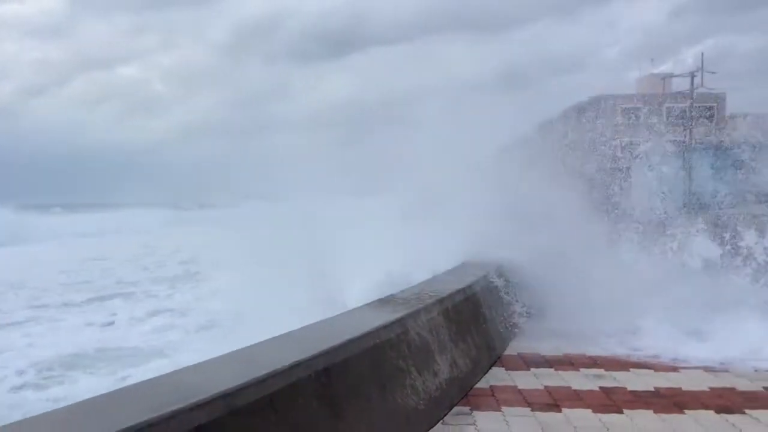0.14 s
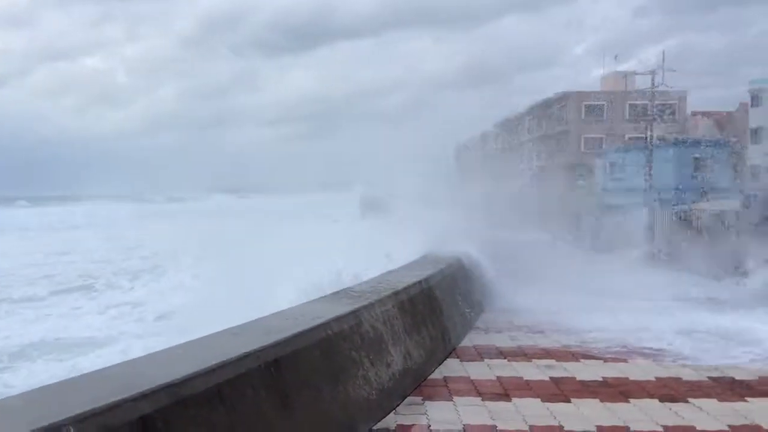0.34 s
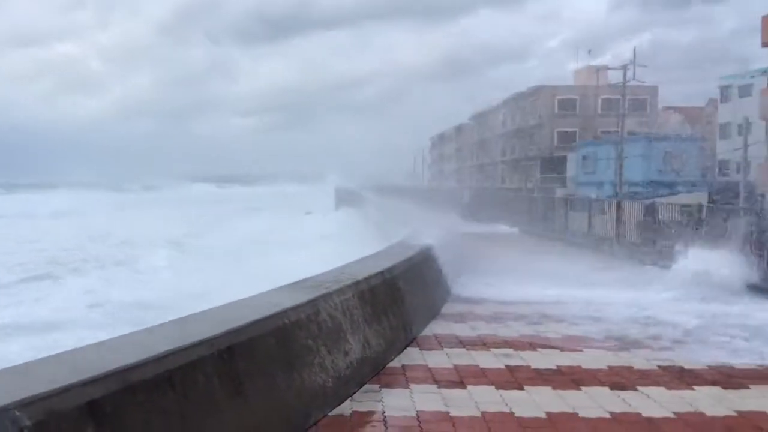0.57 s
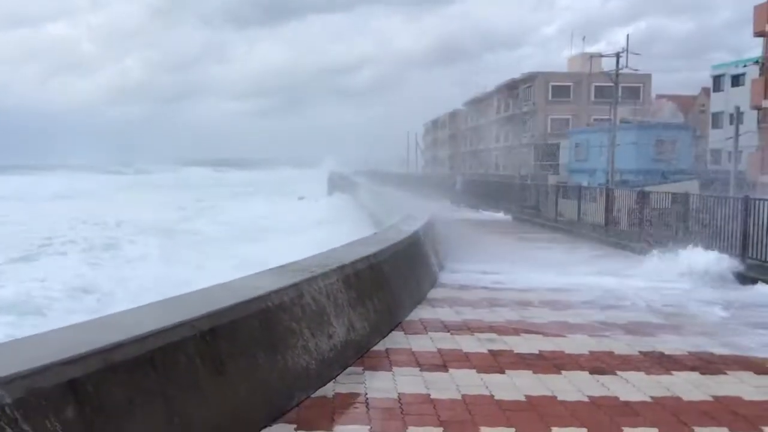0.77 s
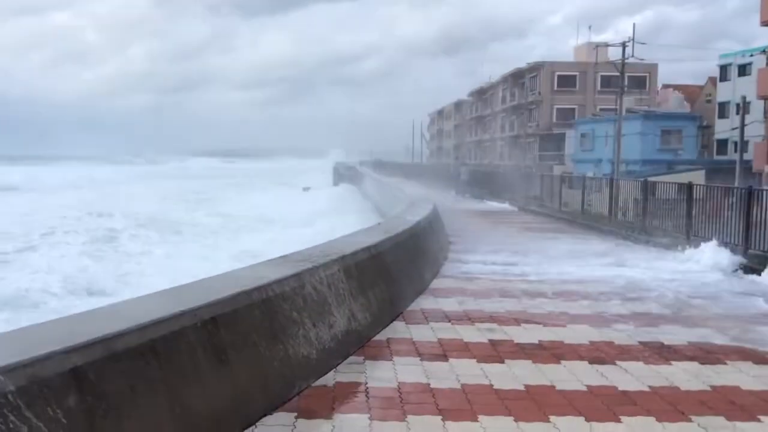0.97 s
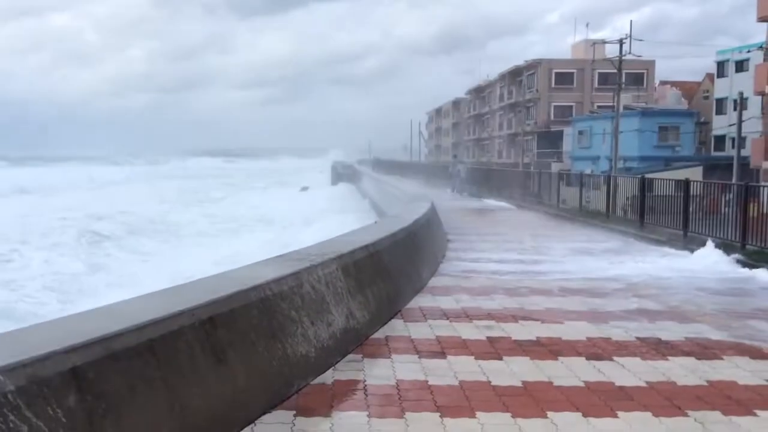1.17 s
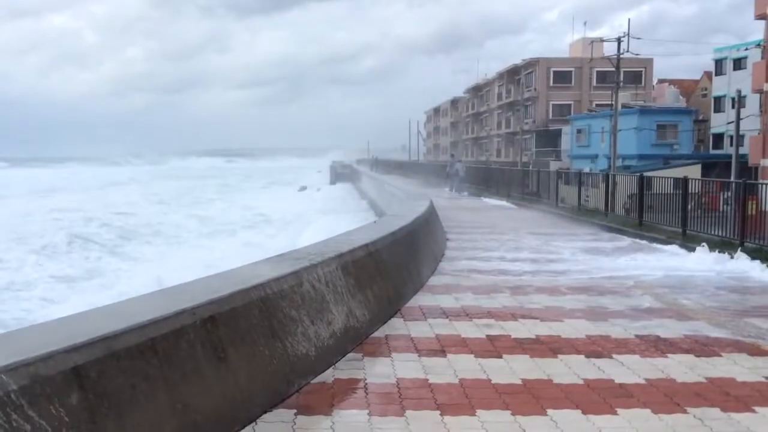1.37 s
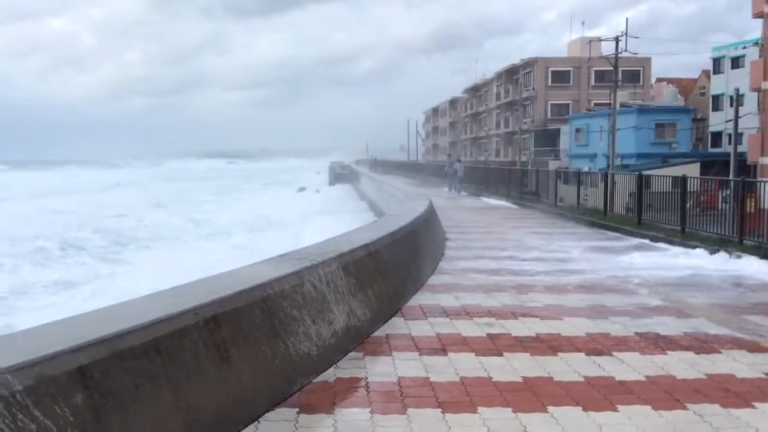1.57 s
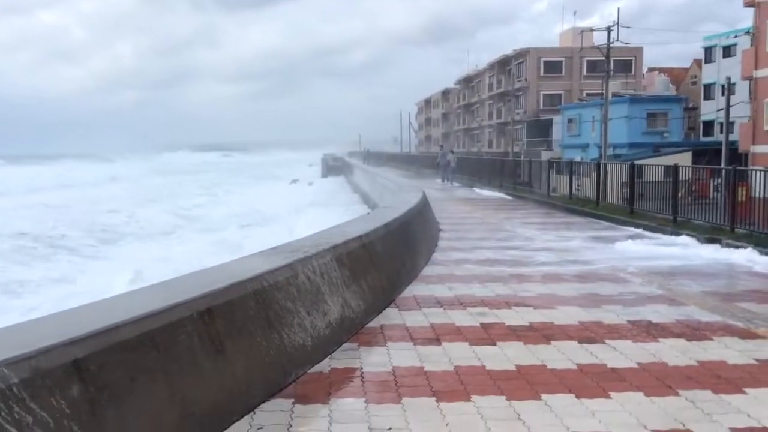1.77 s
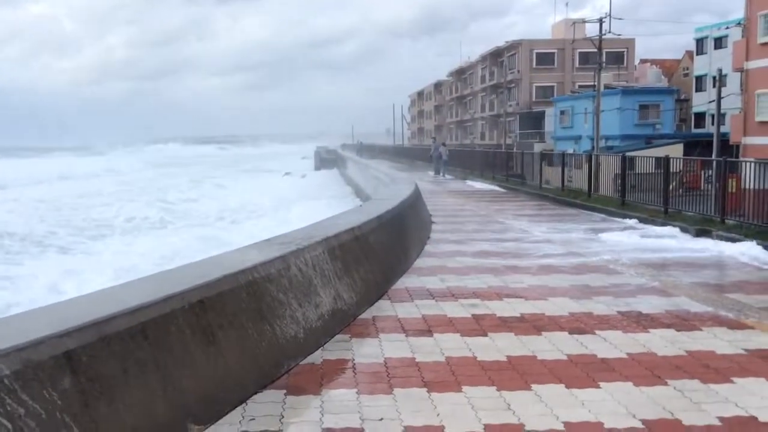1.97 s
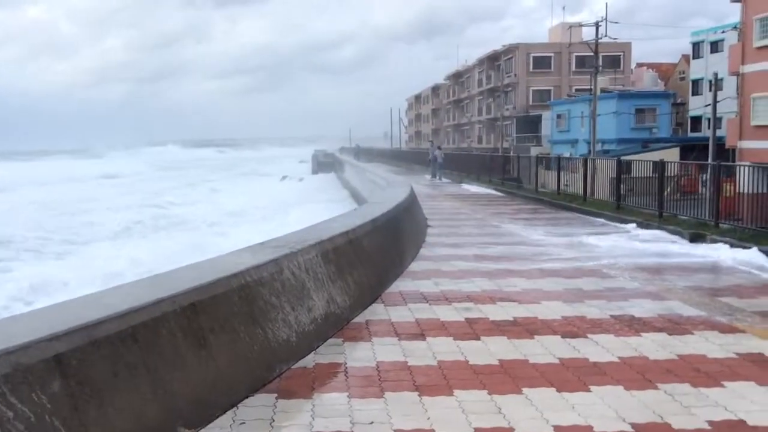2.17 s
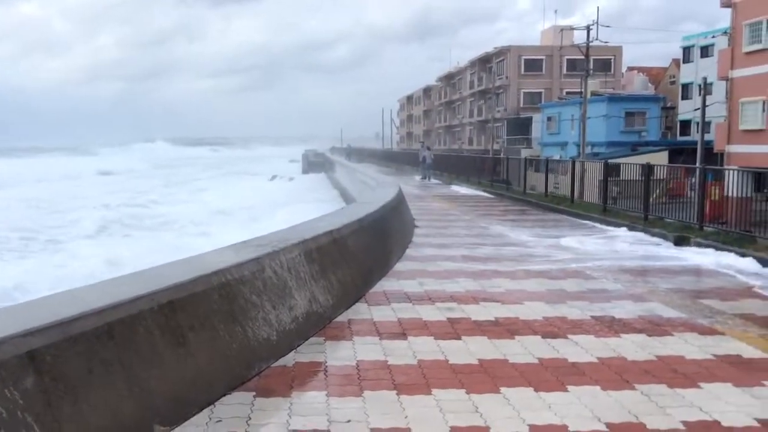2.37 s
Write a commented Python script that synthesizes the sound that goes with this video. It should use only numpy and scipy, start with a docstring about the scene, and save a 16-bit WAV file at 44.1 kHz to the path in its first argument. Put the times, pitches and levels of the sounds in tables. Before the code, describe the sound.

Deep, fluttering rumble of surf and wind outdoors by a seawall, muffled roar beneath; early splatter and bright spray die away, leaving thin foam hiss, faint sloshing and a few watery blips, in mono.

```python
"""Storm surf against a seawall

Heard from the promenade through a small sheltered microphone. Filtered noise gives the deep rumble,
the roar of breaking water and the foam hiss; windowed low tones add to the rumble's unevenness. Dense
random clicks give the burst wave raining down and dying away. Trapped air plops as decaying tones of
rising pitch, sloshing water rings small resonators, and one drop ticks close by as a two-sided pulse."""
import sys
import numpy as np
from scipy import signal
from scipy.fft import rfft, irfft, next_fast_len
from scipy.io import wavfile

SR = 44100
rng = np.random.default_rng(int(sys.argv[2]) if len(sys.argv) > 2 else 0)


def boost_factor(decibels):
    """Convert a level in decibels to a linear amplitude factor."""
    exponent = np.asarray(decibels, float) / 20
    return 10 ** exponent


def waveform_to_disk(signal):
    """Save audio, clipped to [-1, 1], as 16-bit WAV at the path in sys.argv[1]."""
    frames = np.transpose(np.atleast_2d(signal))
    scaled = np.clip(frames, -1, 1) * 32767
    samples = np.round(scaled).astype(np.int16)
    wavfile.write(sys.argv[1], SR, samples)


N = 111573  # length in samples

# Each spectrum table below is a relative power spectrum: pitch_hz, density_db (dB per Hz).

# deep rumble of surf and wind: time_s, level_db
RUMBLE_LEVEL = [(0.0, -41), (0.1, -44), (0.3, -46), (0.55, -43), (0.85, -43.5), (1.1, -42.5), (1.25, -48),
                (1.34, -40.5), (1.54, -46.5), (1.7, -38.5), (1.8, -45.5), (1.95, -43), (2.09, -48),
                (2.15, -41), (2.23, -47), (2.35, -44), (2.4, -43.5), (2.46, -39), (2.53, -45)]
# spectrum of the rumble: pitch_hz, density_db
RUMBLE_SPECTRUM = [(12, -40), (20, -14.5), (35, -8.5), (55, 1.5), (85, -4), (120, -7.5), (170, -17.5),
                   (260, -47)]
# brief random swells within the low rumble: start_s, peak_db, pitch_hz
LOW_SWELLS = [(0.152, -31, 57.5), (0.251, -38, 73.6), (0.386, -35.5, 81.5), (0.704, -33.5, 81),
              (0.819, -39, 80), (0.909, -34.5, 82), (1.012, -30, 109), (1.172, -33, 84.4),
              (1.209, -36.5, 88), (1.343, -39, 70.4), (1.59, -36.5, 74), (1.62, -40, 59.3),
              (1.66, -35.5, 75), (1.689, -34, 76), (1.73, -36, 92), (1.966, -34.5, 79), (2.027, -34, 69.6),
              (2.133, -41, 65), (2.167, -34, 77), (2.319, -34.5, 82)]
# roar of the surf line: time_s, level_db
ROAR_LEVEL = [(0.0, -51.5), (0.1, -46), (0.13, -50.5), (0.39, -51), (0.61, -51), (0.7, -47.5),
              (0.72, -50.5), (0.8, -48), (0.88, -51.5), (1.23, -50), (1.47, -51.5), (1.71, -50),
              (2.03, -51), (2.04, -51), (2.32, -51.5), (2.53, -50)]
# spectrum of the roar: pitch_hz, density_db
ROAR_SPECTRUM = [(70, -37.5), (130, 1), (200, 0), (300, -4), (430, -8.5), (580, -17), (900, -25),
                 (1400, -29.5), (2200, -33.5), (3200, -38), (4500, -42.5), (9000, -50.5)]
# burst wave falling on the paving: time_s, level_db
FALL_LEVEL = [(0, -59), (0.12, -58), (0.27, -60.5), (0.45, -59), (0.64, -64.5), (0.8, -65), (1.1, -70),
              (1.35, -69.5), (1.6, -74), (1.85, -71), (2.1, -74), (2.53, -74.5)]
# spectrum of the splashes: pitch_hz, density_db
FALL_SPECTRUM = [(350, -39), (600, -11), (750, -1.5), (980, -1), (1150, -7.5), (1500, -15), (1850, -17),
                 (2150, -13.5), (2600, -21.5), (3200, -26.5), (4500, -27), (6000, -27.5)]
# bright edge of the falling spray: time_s, level_db
SPRAY_LEVEL = [(0, -69), (0.05, -66.5), (0.1, -70.5), (0.15, -68), (0.2, -63), (0.235, -68), (0.28, -64),
               (0.32, -68), (0.38, -77), (0.55, -75), (0.65, -82.5), (2.53, -86.5)]
# spectrum of the spray: pitch_hz, density_db
SPRAY_SPECTRUM = [(1500, -8), (1900, -12), (2200, 6), (2600, -4), (3300, -6.5), (4300, -15), (5000, -1),
                  (5550, 3), (6100, -5.5), (8000, -19), (10000, -6.5), (12000, -20), (15500, -27)]
# gulps and plops of trapped air: start_s, level_db (before onset and decay), start_pitch_hz, t60_s
AIR_PLOPS = [(0.078, -47, 405, 0.1), (0.098, -45, 410, 0.07), (0.655, -48, 350, 0.12),
             (1.263, -58, 1030, 0.03), (1.341, -51.5, 1200, 0.055), (1.368, -54, 1160, 0.035),
             (1.424, -54, 1200, 0.04), (1.473, -59, 2050, 0.03), (1.506, -56, 1150, 0.03),
             (1.785, -54, 1500, 0.02), (1.802, -55, 1100, 0.03), (1.814, -55.5, 1340, .05)]
# water sloshing along the kerb: start_s, length_s, peak_level_db
KERB_SLOSHES = [(0.17, 0.22, -69), (1.29, 0.27, -70), (1.76, 0.09, -70), (2.297, 0.16, -78)]
# foam and spray hiss: time_s, level_db
HISS_LEVEL = [(0.0, -65), (0.01, -68), (0.31, -64.5), (0.57, -70.5), (0.63, -68.5), (1.09, -72),
              (1.47, -68.5), (1.51, -71), (1.89, -71), (1.94, -73.5), (2.51, -74), (2.53, -71)]
# spectrum of the hiss: pitch_hz, density_db
HISS_SPECTRUM = [(2500, -13), (4600, -12), (5300, -8), (6500, -3), (7200, -2.5), (7850, -0.5), (8600, -5.5),
                 (9400, -5.5), (10000, -12), (11500, -15.5), (13000, -23.5), (15500, -29)]

SWELL_CYCLES = 1.99
SPLASHES_PER_S, SPRAY_DROPS_PER_S = 5000, 9000
PLOP_ONSET_S, PLOP_ROUGHNESS = 0.0022, 0.15  # time constant; rms share of random level
TICK_S, TICK_DB, TICK_DECAY_S = 1.4233, -48, 0.0004  # level before the hollowing filter
BUBBLES_PER_S, BUBBLE_CYCLES = 700, 12.0  # cycles taken to fall by 60 dB
BUBBLE_LOW_HZ, BUBBLE_HIGH_HZ, BUBBLE_PITCHES = 970, 2320, 16


def unit_rms(x):
    """Normalisation: divide a signal by its root mean square."""
    return x / np.sqrt(np.mean(x ** 2) + 1e-20)


def envelope(rows):
    """Amplitude modulation: a gain that follows straight lines in decibels between the rows."""
    time_s, level_db = np.transpose(rows)
    return boost_factor(np.interp(np.arange(N) / SR, time_s, level_db))


def drift(corner_hz):
    """Low-pass random process: white noise through two equal poles, scaled to unit spread."""
    stride = 40  # the process is computed at every 40th sample
    pole = np.exp(-2 * np.pi * corner_hz * stride / SR)
    noise = rng.standard_normal(N // stride + 2002)
    slow = signal.lfilter([1], [1, -2 * pole, pole * pole], noise)[2000:]  # skip the settling
    slow = unit_rms(slow - slow.mean())
    return np.interp(np.arange(N) / stride, np.arange(len(slow)), slow)


def coloured(source, spectrum, waver_db, waver_hz):
    """Spectral shaping: overlapping half-octave-spaced bands waver independently; unit rms."""
    size = next_fast_len(N)
    octave = np.log2(np.arange(size // 2 + 1) * SR / size + 1e-3)
    pitch_hz, density_db = np.transpose(spectrum)
    gain_db = np.interp(octave, np.log2(pitch_hz), density_db, left=-150, right=-150)
    shaped = rfft(source, size) * boost_factor(gain_db)
    out = np.zeros(N)
    for centre in np.arange(np.log2(pitch_hz[0]), np.log2(pitch_hz[-1]) + 0.5, 0.5):
        triangle = np.clip(1 - 2 * abs(octave - centre), 0, 1)
        band = irfft(shaped * triangle, size)[:N]
        out += band * boost_factor(waver_db * drift(waver_hz))
    return unit_rms(out)


def grains(rate_per_s, spread_db):
    """Shot noise: clicks at random instants, of random sign and exponentially spread level."""
    size_db = spread_db * np.minimum(rng.exponential(1, N), 5)
    clicks = boost_factor(size_db) * rng.choice([-1, 1], N)
    return clicks * (rng.random(N) < rate_per_s / SR)


def rumble():
    """Low-frequency turbulence as filtered noise, with brief swells as rounded sine bursts."""
    t = np.arange(N) / SR
    noise = rng.standard_normal(N)
    out = envelope(RUMBLE_LEVEL) * coloured(noise, RUMBLE_SPECTRUM, waver_db=1.0, waver_hz=4.8)
    for start_s, peak_db, pitch_hz in LOW_SWELLS:
        cycles = np.maximum(t - start_s, 0) * pitch_hz
        window = np.sin(np.pi * np.minimum(cycles / SWELL_CYCLES, 1)) ** 2
        out += boost_factor(peak_db) * window * np.sin(2 * np.pi * cycles)
    return out


def roar():
    """Broadband turbulence: breaking water along the surf line as filtered Gaussian noise."""
    noise = rng.standard_normal(N)
    return envelope(ROAR_LEVEL) * coloured(noise, ROAR_SPECTRUM, waver_db=0.4, waver_hz=18.0)


def fall():
    """Superposed impacts: dense uneven splashes coloured by wall and paving, and bright spray."""
    splashes = grains(SPLASHES_PER_S, spread_db=2.5)
    body = envelope(FALL_LEVEL) * coloured(splashes, FALL_SPECTRUM, waver_db=1.64, waver_hz=37.0)
    droplets = grains(SPRAY_DROPS_PER_S, spread_db=2.5)
    spray = envelope(SPRAY_LEVEL) * coloured(droplets, SPRAY_SPECTRUM, waver_db=2.1, waver_hz=21.0)
    return body + spray


def plops():
    """Bubble resonance: trapped air sounds a decaying tone of rising pitch and ragged level."""
    t = np.arange(N) / SR
    ragged = 1 + PLOP_ROUGHNESS * drift(100.0)
    out = np.zeros(N)
    for start_s, level_db, pitch_hz, t60_s in AIR_PLOPS:
        age = np.maximum(t - start_s, 0)
        # the pitch gains three times its starting value per second
        tone = np.sin(2 * np.pi * pitch_hz * age * (1 + 1.5 * age))
        onset = 1 - np.exp(-age / PLOP_ONSET_S)
        out += boost_factor(level_db - 60 * age / t60_s) * onset * ragged * tone
    return out


def tick():
    """Impulsive pressure: a nearby drop as a two-sided exponential pulse that changes sign."""
    u = (np.arange(N) / SR - TICK_S) / TICK_DECAY_S
    pulse = -boost_factor(TICK_DB) * np.sign(u) * np.exp(-np.abs(u))
    middle = signal.lfilter(*signal.butter(1, (2300, 6000), "band", fs=SR), pulse)
    return pulse - 0.5 * middle  # hollow in its middle band


def sloshes():
    """Resonator bank: random clicks ring small bubbles, swelling and sinking along the kerb."""
    t = np.arange(N) / SR
    clicks = grains(BUBBLES_PER_S, spread_db=3.0)
    dealt = rng.integers(0, BUBBLE_PITCHES, N)  # which resonator each click strikes
    ringing = np.zeros(N)
    for k, pitch_hz in enumerate(np.geomspace(BUBBLE_LOW_HZ, BUBBLE_HIGH_HZ, BUBBLE_PITCHES)):
        radius = boost_factor(-60 * pitch_hz / (BUBBLE_CYCLES * SR))
        w = 2 * np.pi * pitch_hz / SR
        poles = [1, -2 * radius * np.cos(w), radius * radius]
        ringing += signal.lfilter([0, np.sin(w)], poles, clicks * (dealt == k) + 1e-18)
    swell = np.zeros(N)
    for start_s, length_s, peak_level_db in KERB_SLOSHES:
        swell += boost_factor(peak_level_db) * np.sin(np.pi * np.clip((t - start_s) / length_s, 0, 1))
    return swell * unit_rms(ringing)


def hiss():
    """High-frequency noise: foam and spray as filtered Gaussian noise."""
    noise = rng.standard_normal(N)
    return envelope(HISS_LEVEL) * coloured(noise, HISS_SPECTRUM, waver_db=0.73, waver_hz=4.6)


def scene():
    """Linear superposition: the pressures of all sources add at one microphone."""
    steady = roar() + hiss()
    surf = rumble() + steady
    water = fall() + sloshes() + plops() + tick()
    return (surf + water)[None]  # one channel


def roll_off(x):
    """The treble ends steeply here."""
    return signal.sosfilt(signal.butter(12, 15630, fs=SR, output="sos"), x)


def record(dry):
    """Signal chain: the microphone's sum goes through one last processing stage."""
    return roll_off(dry)


dry = scene()
out = record(dry)
waveform_to_disk(out)
```